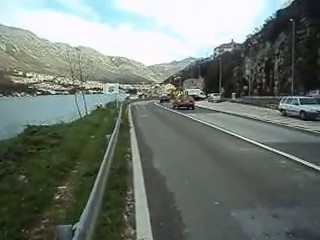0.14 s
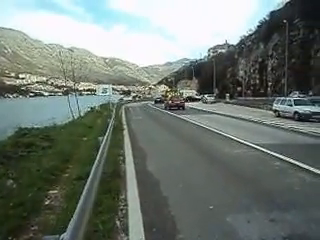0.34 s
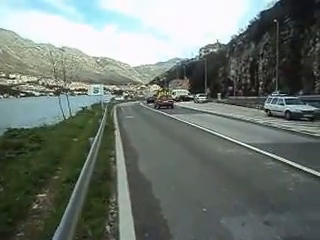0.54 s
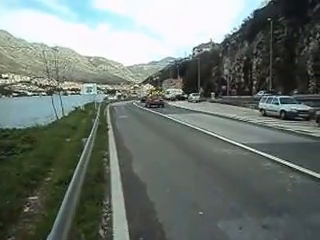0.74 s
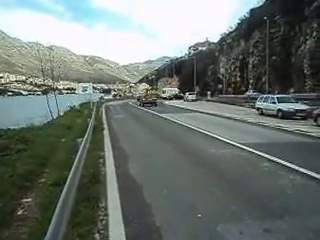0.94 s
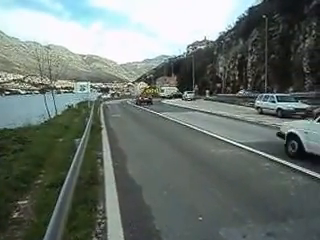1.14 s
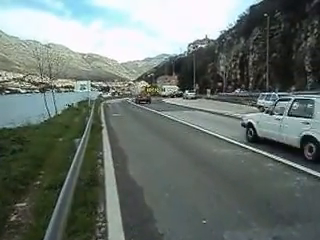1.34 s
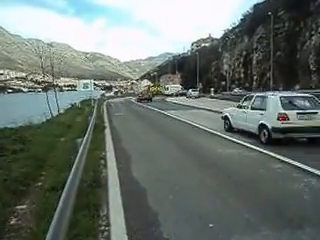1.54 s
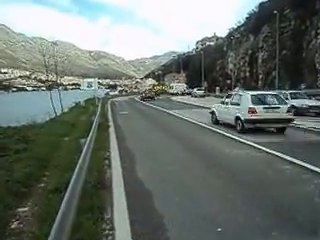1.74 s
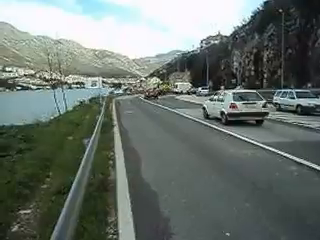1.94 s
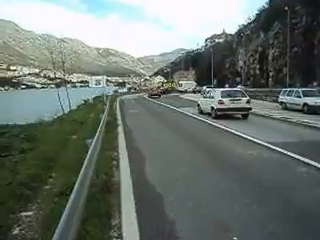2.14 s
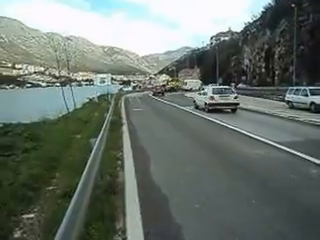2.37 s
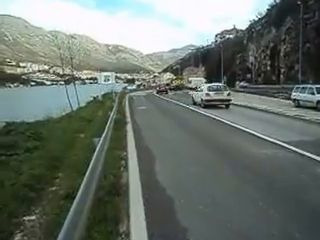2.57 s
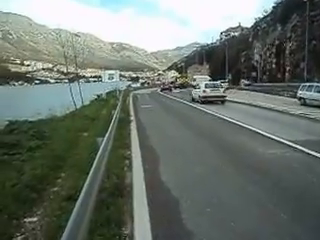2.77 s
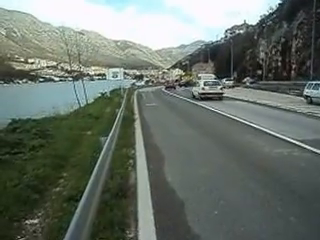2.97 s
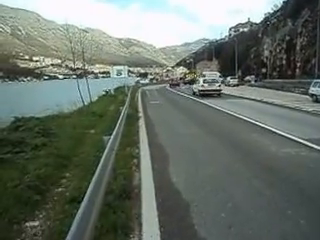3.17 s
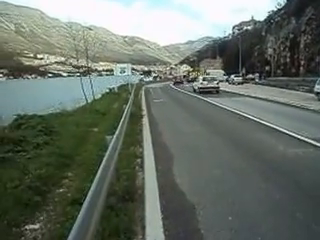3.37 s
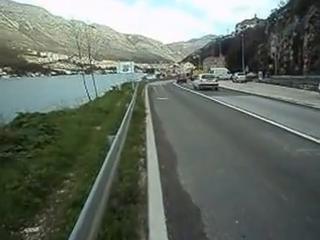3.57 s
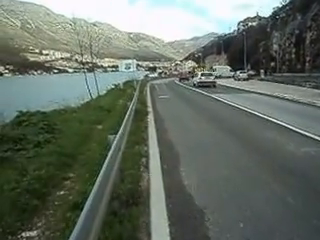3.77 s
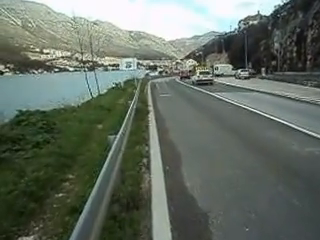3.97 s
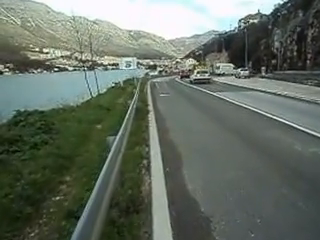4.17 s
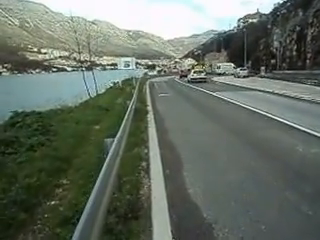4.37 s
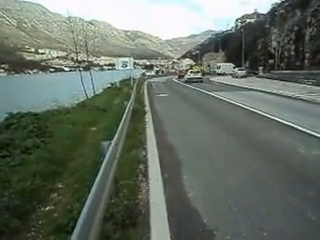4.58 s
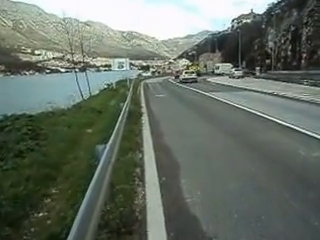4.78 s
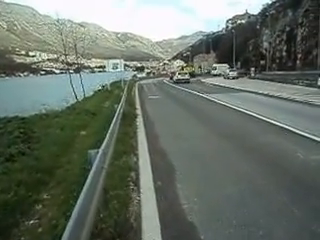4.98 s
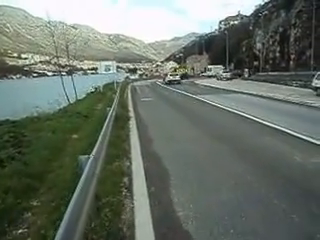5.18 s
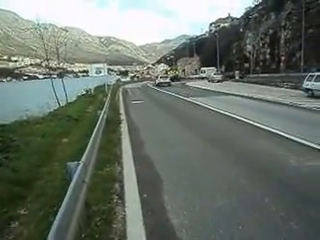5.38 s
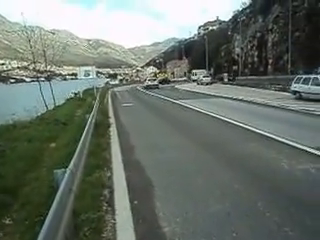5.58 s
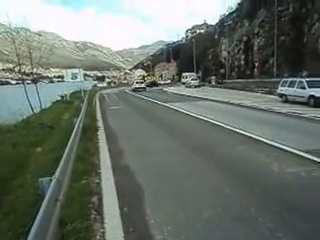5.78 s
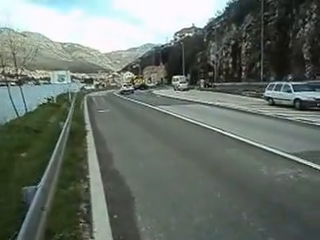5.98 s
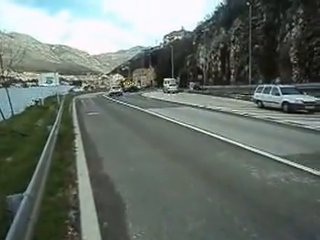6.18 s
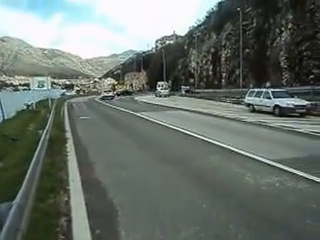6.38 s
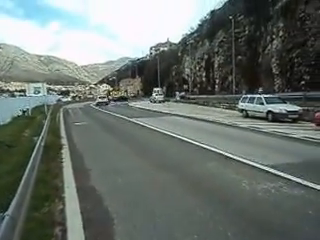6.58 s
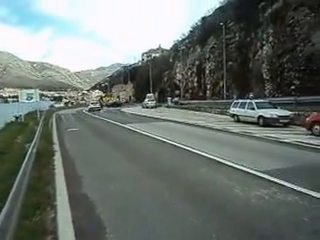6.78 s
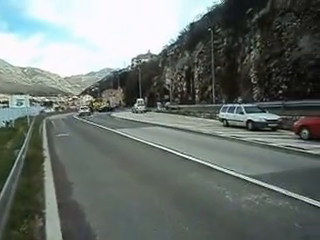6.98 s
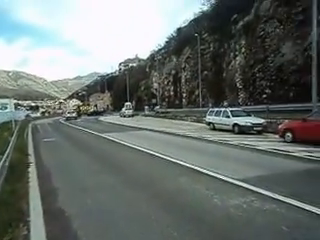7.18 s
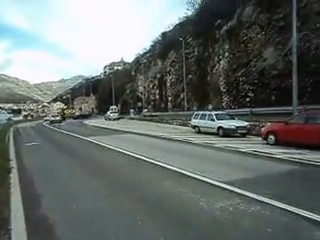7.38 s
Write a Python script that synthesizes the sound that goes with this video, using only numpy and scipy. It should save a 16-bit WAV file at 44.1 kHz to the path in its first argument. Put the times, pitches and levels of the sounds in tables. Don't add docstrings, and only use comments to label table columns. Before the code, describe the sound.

Beside an open coastal road, heard through a small camera microphone with coarse, cut-off treble. From 0 s tyre roar and hiss swell with a diesel growl, strongest about 0.6-1.4 s as the car sweeps close; a brief narrow tread tone from a car ahead dies away by 1 s. Fast valve ticks, about fifteen a second, run through engine-bay noise from 0.3 s, and a thin, high brake whistle comes in faint broken bursts from 1.3 to 3.1 s. The growl sinks and the tyres recede until about 4 s. Grit snaps sharply near 1.1, 2.1, 3.3, 4.9, 5.7 and 7.4 s. Tiny pings and chirps follow at 3.5-4.5 s, over low distant engine drones. From about 3 s another engine emerges softly, climbing clearly after 5 s into a fuller, clattering note until 7.4 s. Soft panel hums and a faint brake squeak come near 5.8 s.

```python
import sys
import numpy as np
from scipy import signal
from scipy.fft import rfft, irfft, next_fast_len
from scipy.io import wavfile
from scipy.ndimage import uniform_filter1d, map_coordinates

SR = 44100
rng = np.random.default_rng(int(sys.argv[2]) if len(sys.argv) > 2 else 0)


def ratio(d):
    e = np.asarray(d, float) / 20
    return 10 ** e


def put_to_file(sound):
    columns = np.atleast_2d(sound).T
    safe = np.clip(columns, -1, 1)
    whole_steps = np.round(safe * 32767)
    wavfile.write(sys.argv[1], SR, whole_steps.astype(np.int16))


N = 327222

# t/s, f/Hz, level/dB
FAR_ENGINES = [
    [(0, 72.96, -44.5), (1.2, 79.04, -38.5), (2.7, 84.5, -43.5), (3.35, 85.2, -47), (3.6, 87, -62),
     (4.8, 91.8, -46)],
    [(1.1, 102.7, -50), (1.9, 106.3, -45.5), (7.1, 104.7, -49.5)],
    [(5.6, 57.94, -42), (6.0, 49.9, -39.5), (6.5, 42.3, -49), (7.42, 45.9, -53.5)],
    [(2.7, 28.3, -47), (5.1, 32.9, -43.5), (5.5, 33.2, -42)],
]
# f/Hz, level/dB
FAR_BASS = [(12, -52.5), (25, -1.5), (45, -2.5), (90, 0), (160, 1), (220, -8.5), (400, -120)]

# t/s, f/Hz
PULLER_FIRING = [(2.8, 35.4), (3.4, 42.2), (3.65, 44), (4.1, 44.6), (4.8, 48), (5.0, 50.8), (5.35, 59.2),
                 (6.0, 72.3), (6.4, 80.2), (6.75, 87.3), (7.15, 94.5), (7.42, 99.6)]
# order/1, firing f/Hz, level/dB, width below/Hz, width above/Hz
SILENCER_BOOMS = [(1, 32, -48.5, 8, 2), (1, 45.5, -47, 1, 2), (1, 58, -38, 7, 6.5),
                  (1, 66.2, -36, 7.9, 8.2), (1, 97.9, -27, 5.4, 9), (2, 34.3, -46.5, 15, 11),
                  (2, 62.8, -41, 4.2, 7.6), (2, 69, -46.5, 6, 4.6), (2, 78, -46, 4, 4),
                  (2, 88, -48.5, 4, 3), (2, 96, -47, 3, 7.1), (3, 44.4, -49, .6, .8),
                  (3, 40.5, -42.5, 4.2, 3.2), (3, 47.3, -45, 3, 2.5), (3, 76, -43, 7, 4.6),
                  (3, 87.6, -41, 6, 4), (3, 92, -43.5, 2, 1.2)]
# order/1, firing f/Hz, level/dB, width below/Hz, width above/Hz
TAILPIPE_BOOMS = [(4, 66, -50, 3, 4), (4, 80, -45, 7, 6), (4, 92, -48, 2, 2), (5, 78, -45, 4, 5),
                  (5, 88, -52, 3, 3), (6, 71, -49.5, 2.5, 3), (6, 88.5, -43, 4, 2.5),
                  (6, 92.8, -43, 2.5, 1.5), (7, 82, -46.5, 2, 2), (7, 88, -44.5, 3, 2.5),
                  (8, 68, -50, 1.5, 2), (8, 76, -50, 3, 3), (9, 71.5, -53, 2, 2), (9, 88, -50, 3, 2),
                  (9, 96, -46.5, 3.5, 4.5), (10, 92, -53.5, 4, 7), (11, 77, -53, 2, 2),
                  (11, 83, -49, 2.5, 2.5), (12, 79, -52, 5, 4), (13, 68, -54, 2, 2),
                  (13, 74.5, -51, 2.5, 3)]
# t/s, level/dB
BLOCK_CLATTER = [(5.5, -82.5), (6, -56.5), (6.7, -56), (7.1, -50.5), (7.42, -52.5)]

# t/s, f/Hz, level/dB, length/s
SEAM_HUMS = [
    (3.3, 211, -43.5, 0.15),
    (4.47, 95, -39.5, 0.15),
    (5.77, 327, -45.5, 0.13),
    (5.77, 539, -46, .14),
    (5.98, 433, -45, .12),
]
# t/s, peak level/dB
GRIT_SNAPS = [(0.534, -37.5), (1.081, -27.5), (2.0967, -22.5), (2.0985, -25), (2.112, -28), (3.3212, -29),
              (3.326, -28.5), (3.33, -29.5), (4.9077, -30.5), (4.92, -28.5), (5.7087, -27), (5.7193, -32),
              (7.3785, -26), (7.389, -30)]
# t/s, peak level/dB
TAPPET_PINGS = [
    (3.476, -50.5),
    (3.558, -49),
    (3.7279, -51.5),
    (3.8117, -49),
    (3.9826, -48.5),
]
# t/s, level/dB, f/Hz
LOOSE_CHIRPS = [
    (3.9, -52, 3250),
    (4.076, -50, 4050),
    (4.176, -50, 3650),
    (4.205, -52, 4100),
    (4.293, -50, 4200),
    (4.437, -51, 3800),
    (4.49, -52, 4100),
]
# t/s, length/s, level/dB
BRAKE_BURSTS = [(1.32, .075, -67.5), (1.4, .12, -68), (1.75, .2, -72), (1.97, .13, -73), (2.14, .05, -73),
                (2.19, .12, -73), (2.24, .055, -77), (2.33, .03, -70), (2.36, .35, -74), (2.705, .23, -73),
                (2.925, .055, -69.5), (2.99, .04, -73), (3.035, .05, -73), (5.69, .19, -77),
                (5.77, .06, -77)]
# t/s, f/Hz
PAD_PITCH = [(1.32, 5322), (1.5, 5315), (1.76, 5345), (1.85, 5325), (2.05, 5365), (2.2, 5345), (2.28, 5380),
             (2.36, 5392), (2.57, 5375), (2.8, 5400), (3.0, 5400), (3.07, 5445), (5.8, 5476)]

# t/s, level/dB
TREAD_LEVEL = [(0, -30), (.25, -28), (.7, -26.5), (1.1, -26.5), (1.35, -26.5), (1.6, -30), (2.1, -33.5),
               (2.7, -36.5), (3.6, -40.5), (4.7, -42), (5.3, -40.5), (5.7, -40), (6.3, -42), (7.42, -39.5)]
# f/Hz, level/dB
RUMBLE_COLOUR = [(120, -36.5), (190, 3.5), (250, 2.5), (400, -3), (520, -19.5), (800, -120)]
# f/Hz, level/dB
ROAR_COLOURS = [
    [(220, -27), (380, -9), (432, -6), (506, -1), (554, -3.5), (609, 0), (765, -2.5), (1350, -8.5),
     (1760, -30.5), (2970, -120)],
    [(220, -37), (380, -7.5), (418, -2.5), (488, -1.5), (572, -2.5), (646, -4), (703, -7), (893, -4),
     (1350, -12), (1760, -25), (2970, -120)],
]
# f/Hz, level/dB
HISS_COLOURS = [
    [(650, -16.5), (1100, -4), (1310, -4), (1810, 1), (2230, -8), (2410, -9), (2900, -23.5), (3770, -38),
     (6380, -120)],
    [(650, -25), (1100, -4), (1330, -3), (1490, 0), (1860, -1.5), (2530, -17), (2680, -30.5), (2900, -17),
     (3770, -43.5), (6380, -120)],
]
# t/s, level/dB
SONG_LEVEL = [(0, -32), (.15, -32.5), (.35, -32.5), (.5, -41.5), (.8, -50), (1.1, -73)]

# f/Hz, level/dB
BAY_COLOUR = [(1400, -33), (2400, -5), (2800, -1.5), (3300, -2), (3900, -1.5), (4300, -4.5), (4800, -11.5),
              (5100, -17.5), (5300, -27.5), (5520, -27), (7000, -65)]
# t/s, level/dB
BAY_LEVEL = [(0, -45.5), (.28, -44.5), (.45, -41.5), (.55, -40.5), (.7, -39.5), (1.4, -40), (2.1, -43.5),
             (3.1, -51.5), (3.5, -50), (4, -53), (4.7, -53.5), (6.3, -52.5), (7.42, -49)]
# t/s, level/dB
FAN_LEVEL = [(0, -70), (.3, -63), (.6, -53.5), (1.1, -53), (1.5, -66), (2.2, -72), (4.5, -70.5),
             (7.42, -71.5)]
# t/s, delay/ms, strength/1
ASPHALT_ECHO = [(0, .36, .25), (.3, 0.37, .35), (.6, .44, .5), (.9, .46, 0.5), (1.2, .49, 0.3),
                (1.6, .51, .33), (2.2, .51, 0), (3.5, 0.52, .3), (5, 0.49, 0.2), (7.42, .49, 0.2)]
# t/s, level/dB
CLOSE_TICKS = [(.313, -42), (.382, -38), (.442, -38), (.502, -34), (.565, -37), (.628, -32.5), (.692, -32),
               (.756, -34), (.82, -35), (.89, -34), (.952, -34), (1.018, -34), (1.083, -30), (1.153, -32),
               (1.219, -36), (1.283, -34), (1.352, -34), (1.422, -34), (1.493, -33), (1.557, -35),
               (1.627, -31), (1.696, -35), (1.764, -36), (1.833, -37), (1.902, -41), (1.971, -38),
               (2.04, -43), (2.11, -42), (2.188, -41), (2.257, -43), (2.328, -40), (2.4, -41), (2.476, -41),
               (2.552, -42), (2.623, -45), (2.7, -48), (2.775, -45), (2.85, -45), (2.923, -46)]
# t/s, f/Hz
TICK_PITCH = [(0, 4700), (.7, 4450), (1.05, 4200), (7.42, 4150)]

# t/s, f/Hz
DIESEL_FIRING = [(0, 67.2), (.2, 65.3), (.35, 64.2), (.6, 63), (.8, 61.6), (1.05, 60.1), (1.25, 59.5),
                 (1.5, 58.4), (2, 57), (3.2, 51.2), (4, 45.5), (4.4, 45.5)]
# order/1, loudest t/s, level/dB, coming/s, going/s
EXHAUST_BEAMS = [(1, .15, -37, .3, .1), (1, .66, -26.5, .09, .3), (1, .95, -24.5, .2, .45),
                 (1, 1.7, -33.5, .4, .33), (1, 2.1, -38.5, .3, .06), (1, 2.65, -44, .15, .4),
                 (1, 3.65, -43.5, .2, .2), (2, .25, -46.5, .2, .3), (2, 1.28, -39.5, .2, .2),
                 (2, 1.95, -46, .2, .3), (3, .25, -30, .1, .2), (3, .57, -26, .16, .1),
                 (3, .81, -23.5, .08, .13), (3, 1.23, -28, .2, .17), (3.5, .95, -39, .2, .18),
                 (3, 1.9, -40, .3, .3), (4, .25, -38, .2, .2), (4, .55, -41, .15, .15),
                 (4, .92, -34, .2, .2), (5, .25, -42, .12, .15), (6, .35, -43, .15, .1)]
# f/Hz, level/dB
MIRROR_LEAK = [(5512, -6), (5725, -4.5), (6025, -10.5), (6325, -18), (6625, -28), (6925, -38), (7225, -55)]

NEAR_DB = -28
RUMBLE_DB, RUMBLE_GROWS, ROAR_DB, ROAR_GROWS = -34.5, 0.84, -28, 0.75
RUMBLE_LEAD_S = 0.21
FIRINGS_PER_TICK, FIRST_TICK = 4, .135
TICKING_S = (2.96, 4.4)
TICK_DB, TICK_SCATTER_DB, TICK_JITTER_S, TICK_HZ = 3.2, 1.5, .002, 4350
TICK_FADE_DB_PER_S = 1.2
TICK_RISE_S, CLOSE_TICK_DB = .005, -3.5
WHISTLE_DB = 2.5
GRABS_PER_S, GRAB_DEPTH = 34, .35
CAMERA_HZ = SR / 4


def unit(x):
    return x / np.sqrt(np.mean(x ** 2) + 1e-20)


def along(points, hz):
    f, v = np.transpose(points)
    return np.interp(np.log(hz + 1), np.log(f + 1), v)


def curves(rows):
    s, *cols = np.transpose(rows)
    return [np.interp(np.arange(N) / SR, s, c) for c in cols]


def sounding(rows):
    t = np.arange(N) / SR
    since, left = t - rows[0][0], rows[-1][0] - t
    return np.clip((np.minimum(since, left) + .1) * 10, 0, 1)


def wobble(rate):
    knots = rng.standard_normal(int(N * rate / SR) + 4)
    return map_coordinates(knots, [np.arange(N) * rate / SR])


def filtered(x, response):
    m = next_fast_len(N + SR // 2)
    return irfft(rfft(x, m) * response(np.fft.rfftfreq(m, 1 / SR)), m)[:N]


def coloured(x, colour):
    return filtered(x, lambda hz: ratio(along(colour, hz)))


def rush(colour, patchy_db):
    z = signal.stft(rng.standard_normal(N), nperseg=512)[2]
    field = uniform_filter1d(rng.standard_normal(z.shape), 5, 0)
    field = uniform_filter1d(field, 12, 1)
    white = signal.istft(z * ratio(patchy_db * unit(field)), nperseg=512)[1][:N]
    return unit(coloured(white, colour))


def turns(hz):
    return 2 * np.pi * np.cumsum(hz) / SR


def order(phase, k, db, flutter_db, drift):
    level = ratio(db + flutter_db * wobble(12))
    return np.sqrt(2) * level * np.sin(k * phase + drift * wobble(7.9) + rng.uniform(0, 7.0))


def peaks(x, rows, k):
    power = 0
    for row_order, at, db, below, above in rows:
        if abs(row_order - k) < .25:
            width = np.where(x < at, below, above)
            power = power + (ratio(db) / (1 + ((x - at) / width) ** 2)) ** 2
    return 10 * np.log10(power)


def knocks(rows, gain_db, t60, noisy):
    out, t = np.zeros(N + SR), np.arange(2000) / SR
    for s, db, hz in rows:
        ring = np.sin(2 * np.pi * hz * t) + noisy * rng.standard_normal(len(t))
        knock = unit(ratio(-60 * t / t60) * (1 - np.exp(-t / 0.00033)) * ring)
        out[round(s * SR):][:len(t)] += ratio(db + gain_db) * knock
    return out[:N]


def bounced(x):
    delay_ms, strength = curves(ASPHALT_ECHO)
    dull = filtered(x, lambda hz: np.clip((5400 - hz) / 900, .05, 1))
    return x + strength * map_coordinates(dull, [np.arange(N) - delay_ms * SR / 1000], mode="mirror")


def rumble_level(tread_db):
    ahead_db = np.interp(np.arange(N) + RUMBLE_LEAD_S * SR, np.arange(N), tread_db)
    return RUMBLE_DB + RUMBLE_GROWS * (ahead_db - NEAR_DB)


def far_traffic(rumble_db):
    return ratio(0.41 * rumble_db - 24.5 + 1.2 * wobble(2.7)) * rush(FAR_BASS, patchy_db=-0.5)


def far_engines():
    out = np.zeros(N)
    for rows in FAR_ENGINES:
        hz, db = curves(rows)
        phase = turns(hz + .6 * wobble(2))
        out += order(phase, 1, db - 1.1 + 2 * wobble(4), flutter_db=2, drift=.2) * sounding(rows)
    return out


def car_pulling_away():
    hz, = curves(PULLER_FIRING)
    phase = turns(hz)
    note = np.zeros(N)
    for k in range(1, 4):
        note += order(phase, k, peaks(hz, SILENCER_BOOMS, k), flutter_db=.6, drift=0.1)
    for k in range(4, 14):
        note += order(phase, k, peaks(hz, TAILPIPE_BOOMS, k), flutter_db=.8, drift=.12)
    colour = [(2000, -36.5), (2500, -5.5), (2900, 1.5), (3300, -5.5), (3800, -12.5), (4600, -34.5)]
    block = rush(colour, patchy_db=0.4)
    clatter = ratio(curves(BLOCK_CLATTER)[0]) * block * (1 + 0.28 * np.cos(phase))
    return (note + clatter) * sounding(PULLER_FIRING)


def seam_hums():
    t, out = np.arange(N) / SR, np.zeros(N)
    for s, hz, db, length in SEAM_HUMS:
        swell = np.exp(-(2 * (t - s) / length) ** 2)
        out += np.sqrt(2) * ratio(db) * swell * np.sin(2 * np.pi * hz * t)
    return out


def grit():
    snaps = knocks([(s, db, 2900) for s, db in GRIT_SNAPS], gain_db=-20, t60=.005, noisy=1.2)
    return coloured(snaps, [(600, -30), (1800, -9), (2600, 0), (3500, 0), (4500, -1), (5500, -20)])


def overrun_rattles():
    pings = knocks([(s, db, 4800) for s, db in TAPPET_PINGS], gain_db=-13, t60=.04, noisy=.4)
    pings = filtered(pings, lambda hz: np.abs(hz - 4800) < 600)
    chirps = knocks(LOOSE_CHIRPS, gain_db=-9.5, t60=.04, noisy=.5)
    return pings + filtered(chirps, lambda hz: np.abs(hz - 3900) < 1000)


def brake_whistle():
    t, swell = np.arange(N) / SR, np.zeros(N)
    for s, length, db in BRAKE_BURSTS:
        arch = np.abs(np.sin(np.pi * np.clip((t - s) / length, 0, 1))) ** .4
        swell += ratio(db) * arch * (t < s + length)
    swell *= 1 + GRAB_DEPTH * np.cos(turns(GRABS_PER_S * (1 + .3 * wobble(14))))
    phase = turns(curves(PAD_PITCH)[0] + 18 * wobble(55))
    return swell * order(phase, 1, WHISTLE_DB + 1.8 * wobble(70), flutter_db=.5, drift=.3)


def body_rumble(rumble_db):
    return ratio(rumble_db + 0.86 * wobble(4.06)) * rush(RUMBLE_COLOUR, patchy_db=0.17)


def tread_song():
    colour = [(1300, -60.0), (1600, -9.0), (1850, 3.0), (2100, -5.5), (2600, -66.0)]
    return ratio(curves(SONG_LEVEL)[0]) * rush(colour, patchy_db=1.0)


def tread_noise(colours, near, patchy_db):
    near_noise = np.sqrt(near) * rush(colours[0], patchy_db)
    return near_noise + np.sqrt(1 - near) * rush(colours[1], patchy_db)


def tyres(tread_db, swell):
    roar_db = ROAR_DB + ROAR_GROWS * (tread_db - NEAR_DB)
    near = np.clip((tread_db + 39.5) / 11, 0, 1)
    roar = ratio(roar_db - 1.7 + 0.32 * swell + 0.6 * wobble(8.7))
    roar = roar * tread_noise(ROAR_COLOURS, near, patchy_db=0.5)
    hiss = ratio(tread_db - 0.22 + .5 * swell + 0.16 * wobble(17))
    return roar + hiss * tread_noise(HISS_COLOURS, near, patchy_db=0.1)


def fan():
    colour = [(4300, -38.5), (4800, 2.5), (5200, -5), (5520, -9.0), (6000, -60.0)]
    return ratio(curves(FAN_LEVEL)[0]) * rush(colour, patchy_db=1.5)


def engine_bay(firing):
    throb = 1 + (0.063 * np.cos(firing) + 0.12 * np.cos(firing / 2)) * sounding(DIESEL_FIRING)
    level = ratio(curves(BAY_LEVEL)[0] + 0.43 * wobble(5.8))
    return level * unit(bounced(throb * rush(BAY_COLOUR, patchy_db=1.0)))


def tick_rows(firing):
    cam = firing / (2 * np.pi * FIRINGS_PER_TICK) - FIRST_TICK
    at = np.flatnonzero(np.diff(np.floor(cam)))
    at = at[(at > TICKING_S[0] * SR) & (at < TICKING_S[1] * SR)]
    jitter, scatter, detune = rng.standard_normal((99, 3))[:len(at)].T
    level_db = curves(BAY_LEVEL)[0][at] + TICK_DB + TICK_SCATTER_DB * scatter
    level_db = level_db - TICK_FADE_DB_PER_S * (at / SR - 1.2)
    rows = []
    for s, db in CLOSE_TICKS:
        hz = np.interp(s, *np.transpose(TICK_PITCH)) * (1 + 0.049 * rng.standard_normal())
        rows.append((s - TICK_RISE_S, db + CLOSE_TICK_DB, hz))
    return rows + list(zip(at / SR + TICK_JITTER_S * jitter, level_db, TICK_HZ * (1 + 0.11 * detune)))


def valve_gear(firing):
    ticks = knocks(tick_rows(firing), gain_db=-7, t60=.048, noisy=3.6)
    colour = [(2500, -28.0), (3300, -2), (3800, 6), (4300, 5.5), (4900, 3), (5300, -12), (5520, -14.0)]
    return ratio(2.5) * bounced(coloured(ticks, colour))


def diesel_exhaust(firing):
    t, note = np.arange(N) / SR, np.zeros(N)
    for k in (1, 2, 3, 3.5, 4, 5, 6):
        note += order(firing, k, peaks(t, EXHAUST_BEAMS, k), flutter_db=.8, drift=0.063)
    return note * sounding(DIESEL_FIRING)


def scene():
    firing = turns(curves(DIESEL_FIRING)[0])
    tread_db, = curves(TREAD_LEVEL)
    rumble_db = rumble_level(tread_db)
    engines = diesel_exhaust(firing) + car_pulling_away() + far_engines()
    swell = wobble(6)
    road = body_rumble(rumble_db) + far_traffic(rumble_db) + tyres(tread_db, swell)
    bay_and_song = engine_bay(firing) + tread_song() + fan()
    details = valve_gear(firing) + grit() + overrun_rattles() + brake_whistle() + seam_hums()
    return (engines + road + bay_and_song + details)[None]


def roll_off(x):
    return signal.sosfilt(signal.butter(12, 7180, fs=SR, output="sos"), x)


def record(dry):
    kept = filtered(dry[0], lambda hz: hz < CAMERA_HZ / 2)
    folded = 2 * kept * np.cos(turns(np.full(N, CAMERA_HZ)))
    image = filtered(folded, lambda hz: ratio(along(MIRROR_LEAK, hz)) * (hz > CAMERA_HZ / 2) * (hz < 7250))
    return roll_off((kept + image)[None])


dry = scene()
out = record(dry)
put_to_file(out)
```